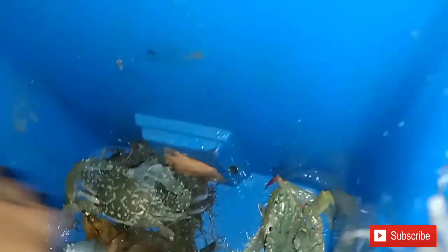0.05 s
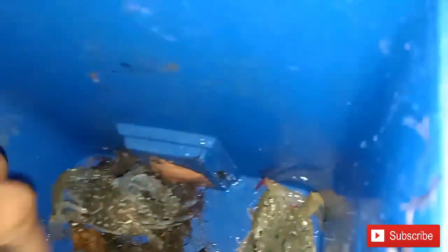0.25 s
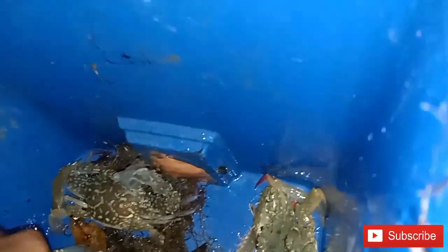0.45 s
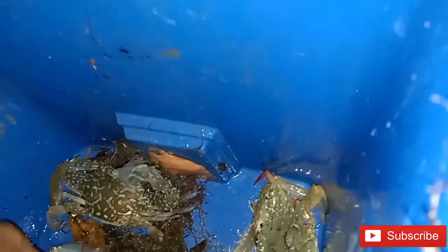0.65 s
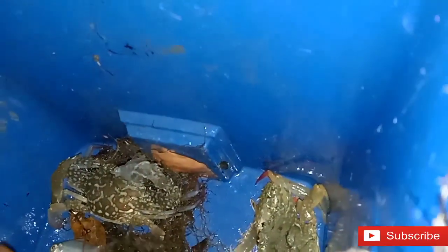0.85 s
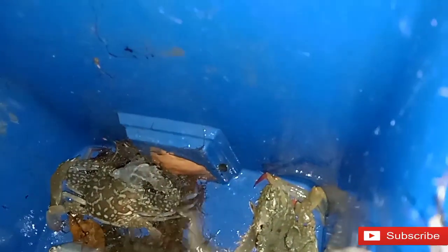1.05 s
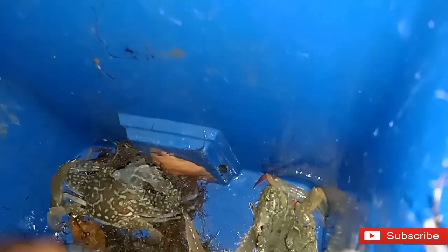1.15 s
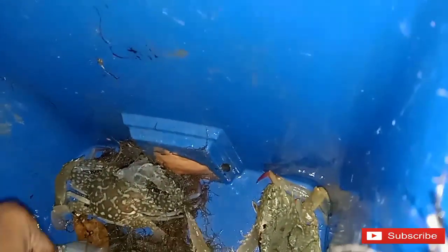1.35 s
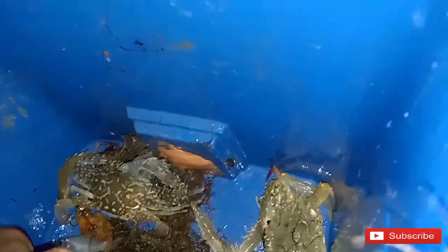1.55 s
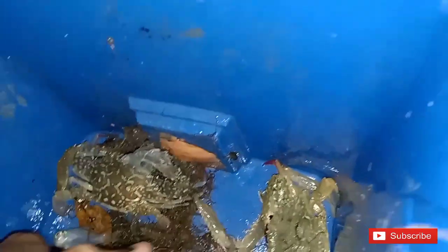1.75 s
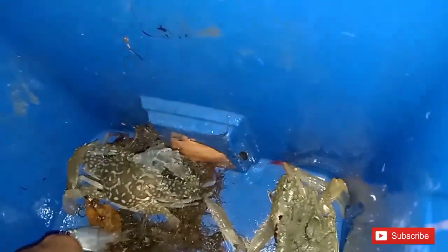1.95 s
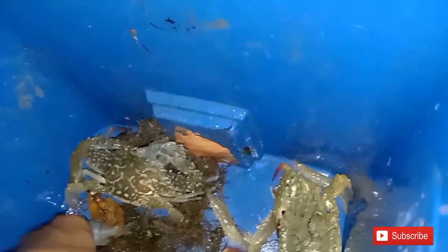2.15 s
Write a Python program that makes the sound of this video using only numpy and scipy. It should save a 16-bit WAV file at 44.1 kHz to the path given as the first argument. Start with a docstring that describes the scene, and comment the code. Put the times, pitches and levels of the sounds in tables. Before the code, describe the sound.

Crabs clatter, scrape and knock about in a plastic tub over a faint low rumble.

```python
"""Just above the rim of a deep plastic tub, in which wet crabs are shifted about.
Shells click on impact and scrape by stick-slip friction, and claw tips squeak along the plastic.
Heavier bodies knock the floor and hard blows strike the wall, exciting damped modes;
the hollow tub rings briefly. Legs tick faintly over a low, uneven rumble and soft booms."""
import sys
import numpy as np
from scipy import signal
from scipy.fft import rfft, irfft
from scipy.io import wavfile
from scipy.ndimage import uniform_filter1d, minimum_filter1d

SR = 44100
rng = np.random.default_rng(int(sys.argv[2]) if len(sys.argv) > 2 else 0)


def pcm_store(signal):
    """Save signal as 16-bit PCM."""
    levels = np.round(np.clip(np.atleast_2d(signal), -1, 1) * 32767)
    wavfile.write(sys.argv[1], SR, levels.astype(np.int16).T)


N = 97020


def undb(db):
    """Decibels to amplitude ratio."""
    return 10 ** (np.asarray(db) / 20)

def unit_rms(x):
    """Scale to an rms of 1."""
    return x / np.sqrt(np.mean(x ** 2) + 1e-18)

def unit_energy(x):
    """Scale to an energy of 1."""
    return x / np.sqrt(np.sum(x ** 2) + 1e-18)

def seconds(size):
    """Time axis."""
    return np.arange(size) / SR

def add(out, start, x):
    """Superposition: mix a sound in at a time in seconds."""
    i = max(int(start * SR), 0)
    out[i:i + len(x)] += x[:max(N - i, 0)]

def through(x, impulse_response):
    """Convolution: the output of a linear system driven by x."""
    return signal.fftconvolve(x, impulse_response)[:len(x)]

def envelope(t, attack, hold, release):
    """Linear rise, then exponential decay from the time `hold`."""
    return np.minimum(t / attack, 1) * np.exp(-np.maximum(t - hold, 0) / release)

def wander(length, size=90):
    """Smoothed noise: a quick random drift with an rms of 1."""
    noise = rng.standard_normal(length)
    return unit_rms(uniform_filter1d(uniform_filter1d(noise, size), size))

def response(spectrum, size=1024):
    """Minimum-phase impulse response of (Hz, dB) points, by folding the cepstrum."""
    hz, db = np.array(spectrum).T
    bin_hz = np.arange(size // 2 + 1) * SR / size
    gain = undb(np.interp(np.log(bin_hz + 1), np.log(hz), db))
    cepstrum = irfft(np.log(gain))
    cepstrum[1:size // 2] *= 2
    cepstrum[size // 2 + 1:] = 0
    return unit_energy(irfft(np.exp(rfft(cepstrum))))

def resonance(spectrum, hz, octaves):
    """Impulse response of a spectrum weighted by one resonance, `octaves` wide at half power."""
    points_hz, db = np.array(spectrum).T
    grid_hz = np.geomspace(points_hz[0], points_hz[-1], 64)
    base_db = np.interp(np.log(grid_hz), np.log(points_hz), db)
    skirt_db = 10 * np.log10(1 + (2 * np.log2(grid_hz / hz) / octaves) ** 2)
    return response(np.c_[grid_hz, base_db - skirt_db])

def modes(table, pitch=1, size=8192):
    """Free vibration: a sum of damped sinusoids, each with a T60 of at most 0.1 s."""
    t = seconds(size)
    return unit_energy(sum(undb(db - 60 * t / min(t60, .1)) * np.sin(2 * np.pi * hz * pitch * t)
                           for hz, db, t60 in table))


# Spectrum of the background air. Each row: frequency in Hz, relative level in dB.
AIR_SPECTRUM = [(30, -36), (100, 3), (300, 8), (600, 8), (1200, 2), (2200, 3.5), (3500, -19), (7500, -15.5),
                (9800, -58), (14000, -86)]

def air():
    """Stationary filtered noise forms a faint background."""
    return undb(-49) * unit_rms(through(rng.standard_normal(N), response(AIR_SPECTRUM, size=4096)))


# Spectrum of the rumble. Each row: frequency in Hz, relative level in dB.
RUMBLE_SPECTRUM = [(20, -35), (35, -11), (50, -9.5), (70, 4), (92, 3), (125, -2), (170, -6.5), (280, -23),
                   (500, -49.5), (1200, -83)]
# Swell of the rumble. Each row: time in seconds, level in dB.
RUMBLE_LEVELS = [(0, -44), (0.092, -60), (0.129, -36.5), (.22, -27), (0.299, -30.5), (.44, -40),
                 (.55, -35.5), (.73, -30), (.85, -28), (1.08, -39), (1.18, -29.5), (1.38, -35.5),
                 (1.46, -44.5), (1.52, -37.5), (1.76, -34.5), (1.86, -39.5), (2.2, -42)]

def rumble():
    """Amplitude modulation: low noise, levelled by its own envelope, swells with the movement."""
    noise = through(rng.standard_normal(N), response(RUMBLE_SPECTRUM, size=8192))
    power = uniform_filter1d(np.abs(signal.hilbert(noise)) ** 2, size=1500)
    swell = undb(np.interp(seconds(N), *np.array(RUMBLE_LEVELS).T))
    return unit_rms(noise / np.sqrt(power)) * swell


# Soft shoves of the tub. Each row: start in seconds, level in dB, frequency in Hz.
SHOVES = [(0.348, -23.5, 93), (0.493, -23, 73.5), (0.555, -22.5, 123.4), (0.596, -22.5, 92),
          (.645, -19, 120), (0.674, -24, 96.5), (.87, -26.5, 104.6), (0.92, -24, 96.4), (0.997, -27.5, 115),
          (2.168, -34.5, 110)]

def booms():
    """Damped oscillation: a soft shove makes the whole tub boom for a few cycles."""
    out, t = np.zeros(N), seconds(8192)
    env = envelope(t, attack=0.0076, hold=0.012, release=0.019)
    for start, db, hz in SHOVES:
        add(out, start, np.sqrt(2) * undb(db) * env * np.sin(2 * np.pi * hz * t))
    return out


def reverberation(sound, t60=0.058, onset_s=0.0014):
    """Dense reflections inside the tub build up quickly and decay exponentially."""
    t = seconds(16384)
    build_up = np.minimum(t / onset_s, 1) ** 2
    reflections = rng.standard_normal(len(t)) * build_up * undb(-60 * t / t60)
    return through(sound, unit_energy(reflections))


# Wall resonances. Each row: frequency in Hz, relative level in dB, nominal T60 in seconds.
WALL_RESONANCES = [(1410, 7.5, 0.12), (1670, 6, 0.048), (1769, 19.5, 0.016), (2112, 15.5, 0.011),
                   (2200, 9, 0.021), (2837, 10, 0.039), (4170, -0.5, 0.024), (6170, 17.5, 0.0071),
                   (7960, -8, .02)]

def wall_ring(shells):
    """Forced vibration: shell contacts drive the modes of the walls."""
    return through(shells, modes(WALL_RESONANCES))


# A shell's hollow body and bright snap. Each row: frequency in Hz, relative level in dB.
BODY_SPECTRUM = [(200, -44), (600, -8), (1000, -10), (1350, -4), (1750, -6.5), (2200, 3), (2800, 0),
                 (3400, -3), (4300, -32), (9000, -60)]
SNAP_SPECTRUM = [(1500, -60.5), (2800, -3), (3700, -1.5), (4600, -1.5), (6000, -1), (7500, 4), (8500, -4),
                 (9800, -17.5), (12500, -35.5), (15000, -62)]
# Activity of the legs. Each row: time in seconds, relative level in dB.
TICK_LEVELS = [(0, -39.5), (.15, -40.5), (.3, -42.5), (.44, -36.5), (.6, -65), (.72, -61), (.95, -48),
               (1.1, -37), (1.5, -44), (1.85, -45.5), (2.2, -44.5)]

def leg_ticks(ticks_per_s=340, count=900, scatter_db=3, grit=2.06):
    """A Poisson process in each of two bands: wet legs make tiny gritty ticks, a few standing out."""
    out, t = np.zeros(N), seconds(768)
    env = envelope(t, attack=0.0008, hold=0.0008, release=0.0025)
    for spectrum, low_hz, high_hz, db in (BODY_SPECTRUM, 1200, 3300, 0), (SNAP_SPECTRUM, 3500, 10000, -4):
        ticks = np.zeros(N)
        starts = np.cumsum(rng.exponential(size=count)) / ticks_per_s
        gains = undb(scatter_db * np.minimum(rng.exponential(size=count), 4))
        for start, gain, hz in zip(starts, gains, rng.uniform(low_hz, high_hz, count)):
            tick = np.sin(2 * np.pi * hz * t) + grit * rng.standard_normal(len(t))
            add(ticks, start, gain * env * tick)
        out += undb(db) * unit_rms(through(ticks, response(spectrum)))
    return out * undb(np.interp(seconds(N), *np.array(TICK_LEVELS).T))


# Claw tips sliding on plastic. Each row: start and length in seconds, relative level in dB,
# first and last pitch in Hz.
CLAW_SLIDES = [(0.303, 0.049, -40.5, 386, 530), (0.467, 0.023, -24.5, 2430, 2270),
               (0.497, 0.0079, -22.5, 2470, 2330), (0.515, .034, -23.5, 2836, 2500),
               (0.601, 0.012, -31, 2430, 2680), (0.657, 0.0088, -17.5, 2670, 2600),
               (0.673, 0.009, -23, 2606, 2290), (.905, 0.01, -26.5, 2590, 2420)]

def claw_squeaks(wobble=0.033, flutter_db=3, overtone_db=-22.5):
    """Stick-slip oscillation: a claw tip slips fast enough to sing a rough, gliding tone."""
    out, t = np.zeros(N), seconds(4096)
    for start, length, db, from_hz, to_hz in CLAW_SLIDES:
        hz = np.interp(t, [0, length], [from_hz, to_hz]) * (1 + wobble * wander(len(t)))
        phase = 2 * np.pi * np.cumsum(hz) / SR
        tone = np.sin(phase) + undb(overtone_db) * (np.sin(2 * phase) + np.sin(3 * phase))
        grip = undb(flutter_db * wander(len(t)))
        env = envelope(t, attack=0.0012, hold=length, release=0.0021)
        add(out, start, undb(db) * env * unit_rms(grip * tone))
    return out


# Floor resonances. Each row: frequency in Hz, relative level in dB, nominal T60 in seconds.
FLOOR_RESONANCES = [(250, 4.5, 0.088), (294.4, 6, 0.074), (310, -9, 0.0095), (368, -3, 0.055),
                    (495, -1, 0.017), (780, -5.5, 0.11), (796, -14, 0.1), (900, 1, 0.026), (1135, 1, 0.044),
                    (1489, -1.5, 0.12)]

def floor_sound(force, pitch=1, cutoff_hz=186):
    """Radiation from a plate: the driven floor rings, but is too small to radiate deep bass."""
    vibration = through(force, modes(FLOOR_RESONANCES, pitch))
    return signal.sosfilt(signal.butter(2, cutoff_hz, "high", fs=SR, output="sos"), vibration)


# Bodies knocking the floor. Each row: start in seconds, relative peak level in dB,
# length of the push in milliseconds, pitch factor of that spot.
FLOOR_KNOCKS = [(0.074, -27, 1.3, 1.16), (0.192, -20.5, 0.2, 0.89), (0.207, -19.5, 0.18, 1.24),
                (0.245, -15.5, 0.25, 0.86), (0.2547, -7.5, 4.1, 1.22), (0.275, -27, 0.54, 0.9),
                (0.345, -22, 6, 0.63), (0.561, -27.5, 12, 0.96), (0.7502, -15, 5.1, 0.89),
                (0.768, -17.5, 5.2, 0.82), (0.822, -22.5, 1.7, 1.04), (1.146, -13, 0.58, 1.27),
                (1.154, -7.5, 2.3, 1.02), (1.205, -8, 0.19, 0.93), (1.3232, -8, 0.12, .92),
                (1.3598, -2, 0.58, 1), (1.392, -23.5, 1.2, 1.314), (1.5856, -14, 2.7, 1.21),
                (1.716, -7.5, 2.5, 1), (1.738, -16, 6.2, 1.22), (1.756, -18.5, 0.79, 1.03),
                (1.773, -23.5, 0.95, 1.06), (1.83, -20, 2.8, 0.93), (1.927, -31, 2, 1.4)]

def floor_knocks():
    """Contact time sets bandwidth: the shorter the push, the more the floor's upper modes ring."""
    out, t = np.zeros(N), seconds(8192)
    for start, db, push_ms, pitch in FLOOR_KNOCKS:
        progress = t * 1000 / push_ms
        thud = floor_sound(progress * np.exp(-4 * progress), pitch)
        add(out, start, 2 * undb(db) * thud / np.abs(thud).max())
    return out


# Modes of the struck wall. Each row: frequency in Hz, relative level in dB, T60 in seconds.
STRUCK_WALL_MODES = [(758.5, -17, 0.078), (1315, -4, 0.027), (1658, -5, 0.034), (2312, 3.5, 0.016),
                     (2470, 1.5, 0.01), (4200, -8, .012), (6400, -8, 0.02)]
# Shells striking the wall. Each row: start in seconds, relative peak level in dB,
# cutoff of the blow in Hz, pitch factor of that spot.
WALL_BLOWS = [(0.2278, 0.5, 2180, .96), (1.2038, -5, 910, 1.14), (1.3222, 5, 2220, 1.015),
              (1.3607, 2, 1080, 1), (1.9269, -1.5, 5500, 1.02)]

def wall_taps(attack_s=0.0012):
    """Impact excitation: the wall gives a hollow tock, and a softer blow loses the upper modes."""
    out = np.zeros(N)
    for start, db, cutoff_hz, pitch in WALL_BLOWS:
        excited = [(hz, level - 10 * np.log10(1 + (hz / cutoff_hz) ** 4), t60)
                   for hz, level, t60 in STRUCK_WALL_MODES]
        ring = modes(excited, pitch)
        tock = ring * np.minimum(seconds(len(ring)) / attack_s, 1)
        add(out, start, undb(db) * tock / np.abs(tock).max())
    return out


def shell(force, ring_share, count=18, t60=0.027):
    """Modal response: a force is heard directly and through the sparse modes of one spot of shell."""
    mode_hz = 1300 + 7400 * (np.arange(count) + rng.random(count)) / count
    ring = modes([(hz, 0, t60) for hz in mode_hz], size=4096)
    return force + ring_share * through(force, ring)

def slips(rate, size, count=256, scatter_db=3, grit=0.58):
    """Relaxation oscillation: uneven stick-slip pulses with grit between them."""
    gap_draws, level_draws = rng.standard_normal((2, count))
    jitter = 0.16 * min(rate / 930, 1) ** 2  # slower slipping is more regular
    onsets = (np.cumsum(np.exp(jitter * gap_draws)) / rate * SR).astype(int)
    pulses = np.bincount(onsets, undb(scatter_db * np.minimum(level_draws, 1)), size)[:size]
    return unit_rms(pulses - pulses.mean()) + grit * rng.standard_normal(size)


# Shells dragged over plastic. Each row: start and length in seconds, relative levels of body
# and snap in dB, centre of the rasp in Hz, slips per second.
SHELL_DRAGS = [(.25, 0.029, -24.5, -37, 1960, 900), (0.309, 0.07, -36, -43, 1970, 810),
               (0.463, 0.043, -32, -39.5, 2460, 630), (0.507, 0.043, -28.5, -25.5, 3300, 704),
               (0.574, 0.036, -34, -55, 2610, 690), (0.648, 0.03, -25.5, -23.5, 2540, 400),
               (0.784, 0.026, -36.5, -49, 2150, 520), (0.819, 0.017, -29.5, -29.5, 2500, 520),
               (0.858, 0.035, -33.5, -64, 2150, 650), (0.904, 0.014, -23, -38, 2540, 450),
               (0.982, 0.047, -32, -41, 2270, 680), (1.04, 0.028, -25, -38, 2200, 580),
               (1.079, 0.17, -31.5, -39, 2160, 900), (1.166, 0.029, -13.5, -23, 2030, 630),
               (1.205, 0.058, -20, -26, 1880, 900), (1.276, 0.056, -18.5, -21.5, 1770, 1130),
               (1.334, 0.022, -11.5, -14, 2110, 1090), (1.45, 0.045, -26.5, -43, 2850, 700),
               (1.549, 0.06, -32, -45, 2080, 700), (1.635, 0.0075, -30, -26, 2400, 600),
               (1.652, 0.054, -21.5, -31, 2300, 600), (1.878, 0.05, -35.5, -65, 1970, 320),
               (1.936, 0.029, -34, -41, 2600, 1270), (1.993, 0.037, -41, -34.5, 2550, 470),
               (2.116, 0.026, -33.5, -31.5, 3100, 790)]

def shell_scrapes(grip_db=3, heavy_below_hz=1766):
    """Stick-slip friction drives the shell; low, heavy rasps also shake the floor."""
    out, t = np.zeros(N), seconds(6144)
    snap_response = resonance(SNAP_SPECTRUM, hz=4730, octaves=1.4)
    for start, length, body_db, snap_db, hz, rate in SHELL_DRAGS:
        env = envelope(t, attack=0.17 * length, hold=length, release=0.0021)
        pressure = undb(grip_db * np.tanh(wander(len(t), size=160)))
        force = shell(env * pressure * slips(rate, len(t)), ring_share=0.73)
        rasp = unit_energy(through(force, resonance(BODY_SPECTRUM, hz, octaves=0.58)))
        floor_share = 2 * undb(-2.5) / (1 + (hz / heavy_below_hz) ** 8)
        body = undb(body_db - 0.76) * (rasp + floor_share * unit_energy(floor_sound(force)))
        snap = undb(snap_db - 3.5) * unit_energy(through(force, snap_response))
        add(out, start, np.linalg.norm(env) * (body + snap))
    return out


# Shell impacts. Each row: start in seconds, relative levels of body and snap in dB,
# contact time in milliseconds, resonances of body and snap in Hz.
SHELL_IMPACTS = [(0.0136, -34, -31.5, 0.87, 2770, 7270), (0.1472, -29.5, -32.5, 5.8, 2460, 5600),
                 (0.158, -32, -30.5, 3.7, 1680, 7600), (0.186, -32, -32, 1.8, 1780, 8430),
                 (0.204, -15, -27, 1.5, 2410, 8200), (0.214, -20.5, -30, 2.1, 1880, 6940),
                 (0.2274, -4, -12, 3.35, 2053, 3806), (0.244, -7.5, -28, 4.1, 2040, 6160),
                 (0.327, -31, -20.5, 1.8, 1790, 7520), (0.342, -19, -23, 1.2, 2300, 5000),
                 (0.4076, -37.5, -30.5, 1.4, 1360, 7090), (0.5562, -18, -25, 3, 2590, 6130),
                 (0.578, -34, -50, 2, 2600, 7800), (0.7277, -24.5, -32.5, 5.4, 2430, 7000),
                 (0.818, -28.5, -49, 2.4, 2600, 5320), (0.858, -22.5, -23, 1.6, 2680, 5080),
                 (0.8842, -21.5, -25.5, 3, 2270, 4040), (1.0053, -26.5, -30, 1.3, 1970, 7400),
                 (1.037, -25, -27.5, 3.5, 2670, 5740), (1.1163, -28, -23, 2.3, 3180, 6430),
                 (1.1453, -15, -29, 7.8, 1730, 5160), (1.154, -20, -39, 3.3, 1710, 4970),
                 (1.2046, -4.5, -10.5, 0.73, 2320, 5500), (1.216, -9.5, -13.5, 2, 2430, 8240),
                 (1.2349, -14, -14, 6, 2070, 8060), (1.248, -6.5, -30, 1.5, 2210, 7500),
                 (1.269, -10, -17.5, 4.6, 2960, 6380), (1.293, -4, -15, 1.04, 2680, 4460),
                 (1.3225, -13, -33, 3.8, 2180, 6500), (1.3606, -10, -22, 5, 1553, 6700),
                 (1.3892, -26, -28, 3.1, 1790, 6160), (1.403, -20.5, -40, 2.6, 2400, 5500),
                 (1.4122, -22, -24.5, 1, 2250, 6000), (1.4559, -19.5, -20, 1.8, 3250, 6460),
                 (1.4681, -30, -18.5, 2.1, 2530, 5940), (1.485, -28, -24.5, 2.7, 2650, 8100),
                 (1.5425, -40, -22.5, 2.2, 3100, 6680), (1.5462, -16.5, -21, 1.5, 2760, 6920),
                 (1.5862, -10.5, -25, 2.8, 1884, 4470), (1.716, -18.5, -25, 3.8, 2300, 7160),
                 (1.7724, -29.5, -39.5, 7.7, 1380, 7320), (1.8176, -34, -63, 16.4, 1290, 6080)]

def shell_clicks(tone_share=0.56):
    """Impact noise: a brief crunch excites two resonances, a hollow body and a bright snap."""
    out, t = np.zeros(N), seconds(3072)
    for start, body_db, snap_db, contact_ms, body_hz, snap_hz in SHELL_IMPACTS:
        env = envelope(t, attack=0.00038, hold=contact_ms / 1000, release=0.0017)
        body = (BODY_SPECTRUM, body_hz, 0.68, body_db + 2.5)
        snap = (SNAP_SPECTRUM, snap_hz, 1, snap_db + 3.5)
        for spectrum, hz, octaves, db in body, snap:
            force = shell(env * rng.standard_normal(len(t)), ring_share=0.24)
            crunch = unit_energy(through(force, resonance(spectrum, hz, octaves)))
            tone = unit_energy(env * np.sin(2 * np.pi * hz * t))
            add(out, start, np.linalg.norm(env) * undb(db) * unit_energy(crunch + tone_share * tone))
    return out


def scene():
    """Superposition: shells ring the walls and, with the knocks and taps, reverberate in the tub."""
    background = rumble() + air() + booms()
    shells = leg_ticks() + shell_clicks() + shell_scrapes() + claw_squeaks()
    contacts = shells + undb(-14) * wall_ring(shells) + floor_knocks() + wall_taps()
    tub = contacts + undb(-8) * reverberation(contacts)
    return (undb(-5) * tub + background)[None]

def record(dry, window_s=0.00099, cutoff_hz=15000):
    """Peak limiting: the gain dips where the sound exceeds full scale; a low-pass cuts the top."""
    size = int(window_s * SR)
    needed_gain = 1 / np.maximum(np.abs(dry), 1)
    gain = uniform_filter1d(minimum_filter1d(needed_gain, size), size)
    low_pass = signal.ellip(8, .1, 50, cutoff_hz, fs=SR, output="sos")
    return signal.sosfiltfilt(low_pass, dry * gain)


dry = scene()
out = record(dry)
pcm_store(out)
```